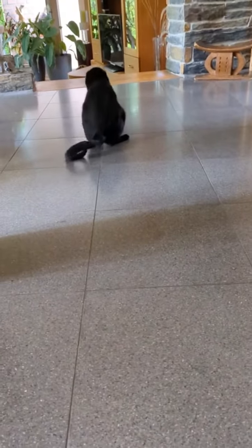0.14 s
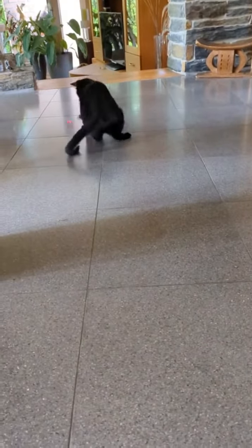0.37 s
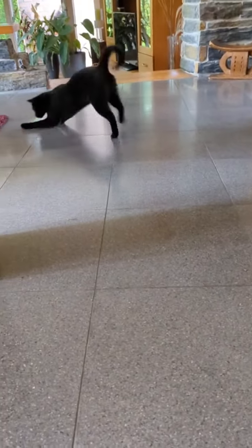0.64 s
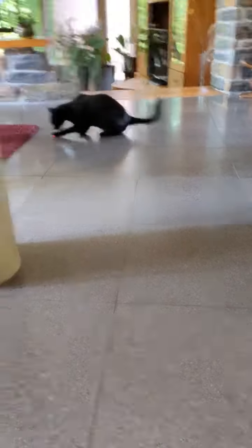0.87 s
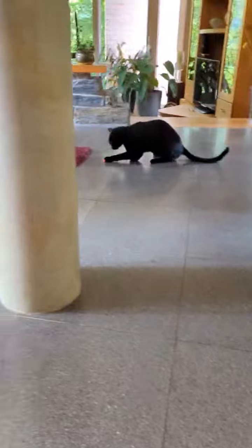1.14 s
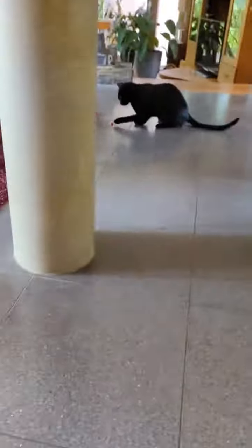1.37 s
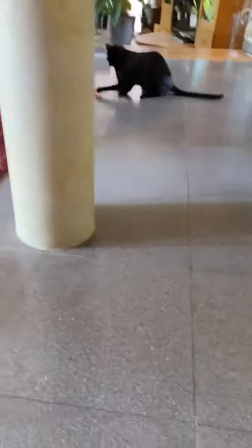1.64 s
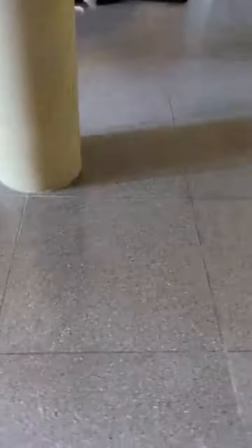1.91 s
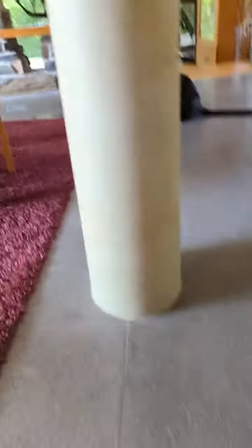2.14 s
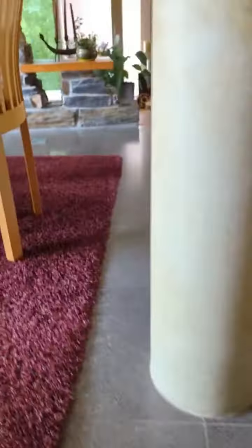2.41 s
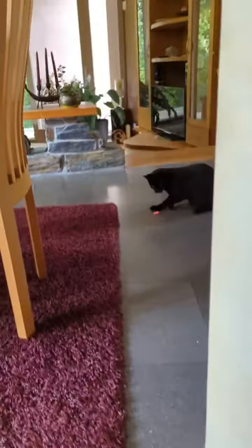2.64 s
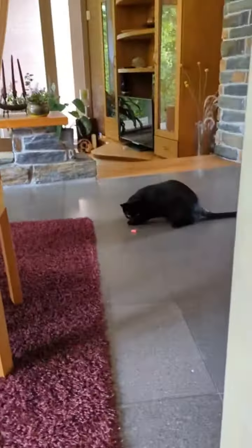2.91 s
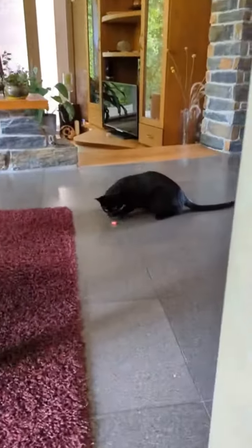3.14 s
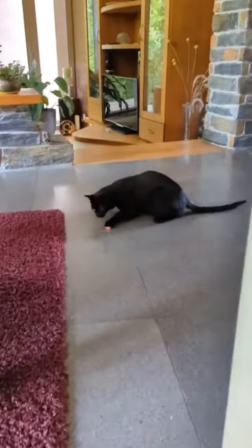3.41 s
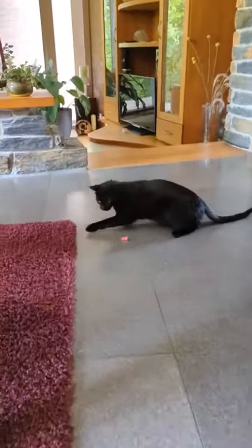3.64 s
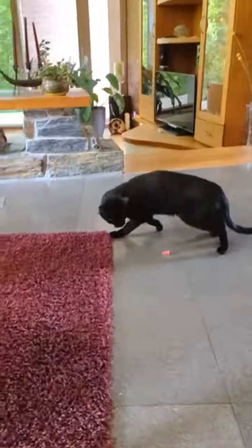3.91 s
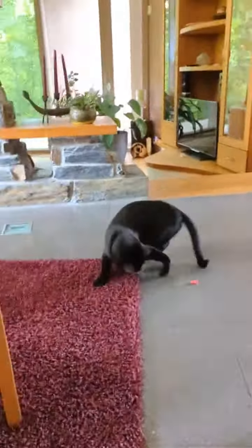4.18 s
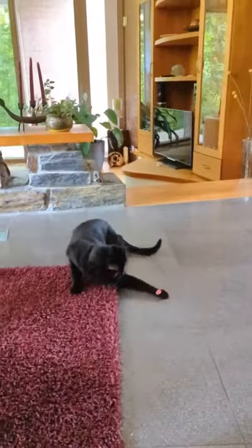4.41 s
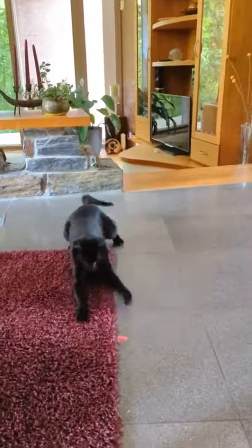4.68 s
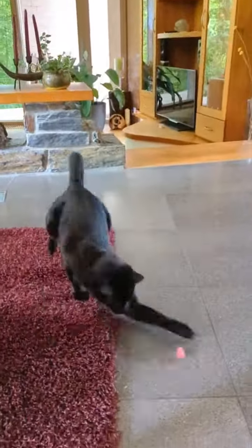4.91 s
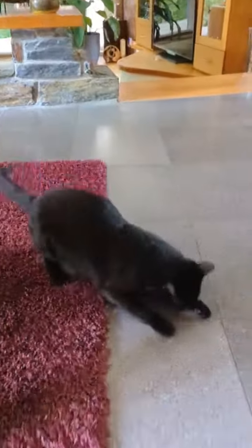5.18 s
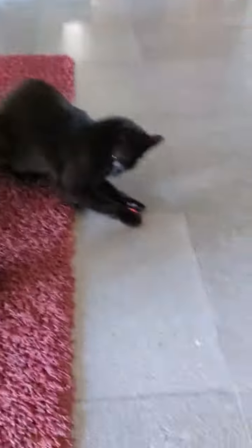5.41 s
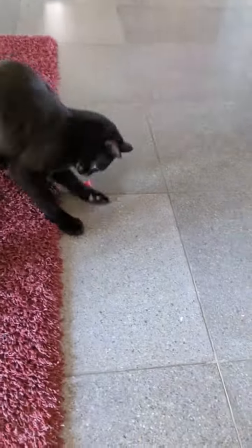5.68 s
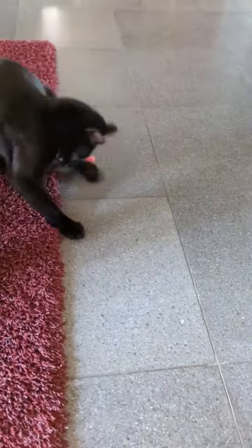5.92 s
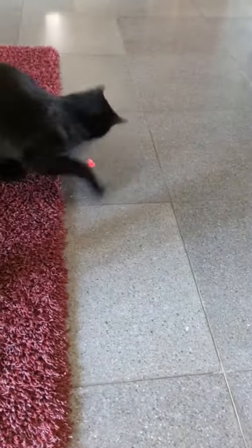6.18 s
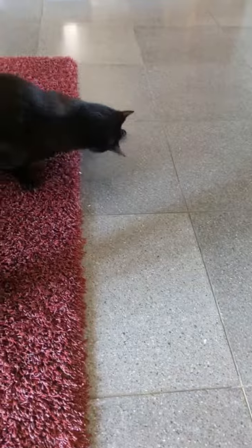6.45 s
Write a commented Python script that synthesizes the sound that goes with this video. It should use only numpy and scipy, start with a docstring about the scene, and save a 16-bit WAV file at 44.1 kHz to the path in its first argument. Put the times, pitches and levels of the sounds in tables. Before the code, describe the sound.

In a large, echoing living room a cat chases a small foam plug over stone. A sharp knock with a low boom comes early, then sparse scuffs. Close finger ticks and rubs sound on the hand-held phone, mostly at right. Skids quicken around four seconds, peak near five with claw clacks and a thin tag jingle, then fade to faint scuffs.

```python
"""Faint air fills a large, echoing living room as the first soft steps boom in its lowest modes.
A cat chases a foam plug over the stone floor: paws knock and skid as bursts of grit, claws snap as clicks.
From 1.6 to 4 s a finger ticks and rubs beside the right port of the hand-held phone, and the grip bumps.
Around 5 s the collar tags jingle as struck modes amid the hardest skids, then the paws grow quieter."""
import sys
import numpy as np
from scipy import signal
from scipy.fft import rfft, irfft
from scipy.io import wavfile
from scipy.ndimage import uniform_filter1d

SR = 44100
rng = np.random.default_rng(int(sys.argv[2]) if len(sys.argv) > 2 else 0)


def natural_amplitude(level_db):
    """Convert a level in decibels to a linear amplitude factor, elementwise."""
    exponent = np.asarray(level_db, float) / 20
    return 10 ** exponent


def unload_wav(signal):
    """Save mono or channel-first audio to the path in sys.argv[1] as 16-bit WAV at rate SR, clipped to [-1, 1]."""
    wavfile.write(
        sys.argv[1],
        SR,
        np.round(np.clip(np.atleast_2d(signal).T, -1, 1) * 32767).astype(np.int16),
    )


N = 289296
TIME = np.arange(N) / SR


def rms_one(x):
    """Scale to unit rms."""
    return x / np.sqrt(np.mean(x ** 2) + 1e-20)


def at_hz(points, hz):
    """Read a curve over frequency on a log axis."""
    curve_hz, value = np.transpose(points)
    return np.interp(np.log(hz), np.log(curve_hz), value)


def band(x, low_hz, high_hz):
    """Band-pass."""
    sos = signal.butter(2, [low_hz, min(high_hz, .45 * SR)], "band", fs=SR, output="sos")
    return signal.sosfilt(sos, x)


def ring(clicks, hz, t60):
    """A damped resonance: a unit click starts a sine of height 1 that falls 60 dB in t60 seconds."""
    decay, turn = natural_amplitude(-60 / (t60 * SR)), 2 * np.pi * hz / SR
    return signal.lfilter([0, np.sin(turn)], [1, -2 * decay * np.cos(turn), decay * decay], clicks + 1e-18)


def click_at(s):
    """A unit click at s seconds."""
    return 1. * (np.arange(N) == round(s * SR))


def grit(size, spread_db):
    """Dense grains of uneven size, as from a rough surface sliding."""
    grain_db = spread_db * np.minimum(rng.exponential(1, size), 5)
    return rms_one(natural_amplitude(grain_db) * rng.choice([-1, 1], size))


def even_burst(size, landing):
    """Grit under a pressure that rises and lifts, spread evenly over all pitches; energy 1."""
    progress = np.arange(1, size + 1) / (size + 1)
    lumps_db = np.interp(progress, np.linspace(0, 1, 12), rng.normal(0, 4, 12))  # the paw slips unevenly
    shape = progress ** landing * (1 - progress) ** 0.896 * natural_amplitude(lumps_db)
    burst = grit(size, spread_db=3.0) * shape
    # flatten the spectrum and restore the envelope in turn
    for _ in range(4):
        spectrum = rfft(burst, 2 * size)
        burst = irfft(spectrum / (abs(spectrum) + 1e-12))[:size]
        local_power = uniform_filter1d(burst ** 2, size=max(size // 6, 8))
        burst *= shape / np.sqrt(local_power + 1e-12)
    return burst / np.sqrt(np.sum(burst ** 2))


# thud, pad, scuff, claw and hiss registers: (low f/Hz, high f/Hz)
PAW_REGISTERS = [(270, 578), (560, 962), (960, 2050), (2150, 3460), (3500, 13800)]
# short knocks of a paw: (t/s, relative level/dB, tilt/dB per register, extra scuff level/dB, hiss level/dB)
PAW_KNOCKS = [(.786, -20.5, 0.5, -10, -28.5), (1.188, -53.5, 5.5, -6, -52), (1.233, -37.5, -4.5, 0, -41),
              (1.6, -81, -9, -1, -56), (2.263, -58.5, 4.5, 1, -55), (3.206, -60, -1, 0, -64),
              (3.413, -58.5, 5.5, 7, -64), (4.587, -44.5, 3, 5, -51), (4.952, -36.5, 4.5, 2.5, -28),
              (5.073, -40.5, 0, 3, -35)]
# skids of pads and fur: (t/s, length/s, relative level/dB, tilt/dB per register, hiss level/dB)
PAW_SKIDS = [(0.3, 0.079, -68, 1, -60.5), (1.369, .06, -61, 1, -58.5), (2.667, 0.062, -65.5, -4, -56),
             (2.77, .17, -52.5, -3.5, -55), (3.47, .1, -40.5, -.5, -32.5), (3.881, 0.038, -50.5, -0.5, -33),
             (3.955, 0.052, -39, 0, -23), (4.019, 0.051, -37.5, -1.5, -25.5), (4.187, 0.11, -35, -1, -27.5),
             (4.307, 0.037, -36, 1, -23), (4.602, 0.057, -46.5, 2.5, -48.5), (5, .046, -23, -1, -21),
             (5.465, 0.087, -49, -0.5, -44.5), (5.575, .084, -51, -1.5, -51.5),
             (5.791, 0.031, -51.5, -1, -48.5), (6.05, 0.24, -72, 4, -52), (6.358, 0.086, -68, -9, -57.5)]
KNOCK_S, SKID_SCUFF_DB = .014, 3
KNOCK_LANDING, SKID_LANDING = 0.38, 0.907   # steepness of the pressure's rise (small = sudden)


def paws():
    """Each contact is a burst of grit shared over five registers; its tilt favours the thud or the claw."""
    drive = np.zeros((len(PAW_REGISTERS), N))
    contacts = [(s, KNOCK_S, KNOCK_LANDING, *rest) for s, *rest in PAW_KNOCKS]
    contacts += [(s, length, SKID_LANDING, db, tilt, SKID_SCUFF_DB, hiss_db)
                 for s, length, db, tilt, hiss_db in PAW_SKIDS]
    for s, length, landing, db, tilt, scuff_db, hiss_db in contacts:
        body_db = db + tilt * (np.arange(4) - 3 / 2) + [0, 0, scuff_db, 0]
        register_db = np.append(body_db, hiss_db)
        at, size = round(s * SR), round(length * SR)
        drive[:, at:at + size] += natural_amplitude(register_db)[:, None] * even_burst(size, landing)
    out = np.zeros(N)
    for burst, (low, high) in zip(drive, PAW_REGISTERS):
        # filtered twice, so that neighbouring registers join evenly at their edges
        filtered = band(band(burst + 1e-18, low, high), low, high)
        out += filtered * np.sqrt(SR / 2 / (high - low))   # makes up for the narrowness of the band
    return out


# a claw or pad snaps off the stone with a pitch of its own: (t/s, relative level/dB, f/Hz)
CLAW_CLACKS = [(1.195, -41.5, 3800), (1.6, -59, 6300), (2.69, -60, 258), (2.9, -49.5, 255),
               (2.905, -48.5, 566), (4.6, -38.5, 1510), (4.955, -25, 773), (5.015, -23.5, 1180),
               (5.81, -53, 1120), (6.36, -51, 248), (6.425, -52, 223)]
CLACK_CYCLES = 28   # periods to fall 60 dB


def clacks():
    """One click into a short resonance; the level column sets its energy."""
    out = np.zeros(N)
    for s, db, hz in CLAW_CLACKS:
        snap = ring(click_at(s), hz, CLACK_CYCLES / hz)
        out += natural_amplitude(db) * snap / np.sqrt(np.sum(snap ** 2))
    return out


# collar tags touching: (t/s, first tag relative level/dB, second tag relative level/dB, brightness/dB per octave)
TAG_TOUCHES = [(4.59, -67, -84, -20), (5.078, -49.5, -52, 0), (5.105, -54.5, -49, -7),
               (5.139, -50.5, -56, 0), (5.185, -59, -71, 6), (5.231, -64.5, -71, -17),
               (5.29, -71, -88, -13)]
# modes of the metal: (f/Hz)
TAG_MODES_HZ = [3731, 5825, 6880, 7515, 8484, 9851, 10680, 12270, 13200, 14460, 14890, 15160, 15520]
# strength of each mode: (relative level/dB)
TAG_MODES_DB = [-19.5, -14, -16.5, -8, 0, -8.5, -7, -9, -21, -4.5, -20, -22, -8]
# the tag each mode belongs to: (0 = first, 1 = second)
TAG_OF_MODE = [1, 0, 1, 1, 1, 1, 0, 0, 1, 1, 0, 1, 0]
TAG_T60_S = .12


def tags():
    """Two small metal tags: every touch strikes each mode with its own strength; the room adds a longer tail."""
    s, *tag_db, bright = np.transpose(TAG_TOUCHES)
    out = np.zeros(N)
    luck_db = rng.normal(0, 3, (len(s), len(TAG_MODES_HZ)))
    for k, (hz, mode_db) in enumerate(zip(TAG_MODES_HZ, TAG_MODES_DB)):
        strike_db = tag_db[TAG_OF_MODE[k]] + mode_db + bright * np.log2(hz / 10000) + luck_db[:, k]
        clicks = np.zeros(N)
        clicks[(s * SR).astype(int)] = natural_amplitude(strike_db)
        out += ring(clicks, hz, TAG_T60_S)
    return out


# left-right likeness of diffuse sound: (f/Hz, likeness from -1 to 1)
STEREO_LIKENESS = [(60, 0.14), (250, 0.96), (500, 0.44), (1000, -0.085), (3000, 0.008), (12000, 0.015)]
EDGES_HZ = 30 * 2 ** np.arange(0, 9.6, .5)   # half-octave band edges


def stereo_bands(size):
    """Half-octave bands of stereo noise, most alike in the upper bass, nearly unrelated in the treble."""
    white = rng.standard_normal((2, 2, size))
    for k, (low, high) in enumerate(zip(EDGES_HZ, EDGES_HZ[1:])):
        hz = np.sqrt(low * high)
        alike = np.clip(at_hz(STEREO_LIKENESS, hz), -1, 1)
        mid, side = band(white[k % 2], low, high)
        stereo = np.sqrt(1 + alike) * mid + np.sqrt(1 - alike) * side * [[1], [-1]]
        yield hz, stereo / np.sqrt(2)


# reverberation time of the room: (f/Hz, T60/s)
ROOM_DECAY = [(60, 0.81), (160, 0.83), (420, 0.66), (1100, 0.76), (2900, 0.71), (7700, 0.5), (15000, 0.4)]
DIRECT_DB, BUILD_UP_S = 19.5, .009


def room(x):
    """A direct sound weaker than the sum of the dense echoes, which build up, then die fastest in the treble."""
    t = np.arange(SR) / SR
    echoes = sum(noise * natural_amplitude(-60 * t / at_hz(ROOM_DECAY, hz)) for hz, noise in stereo_bands(SR))
    echoes = echoes * (1 - np.exp(-t / BUILD_UP_S))
    echoes[:, 0] = natural_amplitude(DIRECT_DB)
    return signal.fftconvolve(x[None], echoes, axes=1)[:, :N]


# soft steps: (t/s, level/dB, pitch centre f/Hz)
SOFT_STEPS = [(.397, -55, 92), (.643, -58, 85), (.795, -28.5, 88), (1.076, -51, 69.6), (1.242, -33, 109),
              (1.511, -44.5, 81), (2.269, -47, 138), (3.118, -57, 190), (3.501, -38.5, 160),
              (4.038, -55, 140), (4.224, -49, 161), (4.336, -45, 176), (4.613, -54, 138),
              (4.97, -47.5, 131), (5.496, -59, 125), (5.617, -58.5, 126), (5.739, -59.5, 106.7),
              (6.373, -55.5, 147)]
# lowest modes of the room: (f/Hz)
BOOM_MODES_HZ = [55, 68, 78.8, 89, 107, 123, 137.2, 164, 183, 210.4, 230.4, 246]
STEP_T60_S, STEP_WIDTH_OCT = 0.56, 0.75


def steps():
    """A soft push starts the low modes near its own pitch, each at a phase of its own."""
    out = np.zeros(N)
    phases = rng.random((len(SOFT_STEPS), len(BOOM_MODES_HZ), 1))   # in turns
    t = np.arange(SR) / SR
    rise = 1 - np.exp(-t / .006)
    for (s, db, centre_hz), phase in zip(SOFT_STEPS, phases):
        octaves_away = np.log2(np.array(BOOM_MODES_HZ) / centre_hz)
        near = np.exp(-(octaves_away / STEP_WIDTH_OCT) ** 2)
        modes = near @ np.sin(2 * np.pi * (np.outer(BOOM_MODES_HZ, t) + phase))
        boom = natural_amplitude(db) * modes / np.sqrt(np.sum(near ** 2)) * rise * natural_amplitude(-60 * t / STEP_T60_S)
        at = round(s * SR)
        out[at:at + SR] += boom[:N - at]
    return out


# finger ticks on the case: (t/s, relative level/dB, ring f/Hz, low push relative level/dB)
FINGER_TICKS = [(1.911, -17, 437, -58), (1.989, -23.5, 207, -38), (2.139, -42, 1990, -58),
                (2.164, -22.5, 740, -54), (2.901, -33.5, 486, -73), (2.963, -24.5, 605, -34),
                (2.982, -28.5, 340, -40.5), (3.007, -28, 507, -44), (3.033, -25, 415, -38.5),
                (3.416, -38, 1450, -54), (3.915, -22.5, 333, -50)]
# finger sliding by the right port: (start t/s, end t/s, relative level at start/dB, at end/dB)
FINGER_RUBS = [(1.596, 1.848, -61, -57), (1.856, 1.885, -47, -49), (1.91, 2.015, -39.5, -35.5),
               (2.129, 2.167, -55.5, -51), (2.172, 2.225, -39, -45.5), (3.035, 3.143, -47, -52.5),
               (3.929, 3.971, -45.5, -29.5)]
# spectrum of the rub: (f/Hz, relative level/dB per Hz)
RUB_SPECTRUM = [(180, -38), (300, -1), (1000, -2.5), (2800, -0.5), (5400, 0), (8100, -4), (11000, 2.5),
                (14300, -44), (22000, -120)]
TICK_LEFT_DB, RUB_LEFT_DB = -37, -30   # left port against right
RUB_LAND_DB_PER_S, RUB_LIFT_DB_PER_S, RUB_TOP_HZ = 4000, 904, 11140


def finger():
    """Dry and close: skin sticks and lets go with a tick, a short fizz and a push, and slides with a rough hiss."""
    out, t = np.zeros((2, N)), np.arange(SR // 20) / SR
    top_cut = signal.cheby2(6, 30, RUB_TOP_HZ, fs=SR, output="sos")
    fizz = band(rng.standard_normal((len(FINGER_TICKS), len(t))), 1800, 10500)
    fizz = signal.sosfilt(top_cut, fizz)
    for (s, db, hz, push_db), noise in zip(FINGER_TICKS, fizz):
        # starts as a bright snap, falls to the case's ring
        cycles = hz * (t + 0.00182 * (1 - np.exp(-t / 0.00018)))
        tick = np.sin(2 * np.pi * cycles) * t / 0.00052 * np.exp(1 - t / 0.00053)
        tick += 0.39 * noise * np.exp(-(t / 0.0046) ** 3)
        push = np.sin(2 * np.pi * 110 * t) * np.exp(-t / 0.0089)
        at = round(s * SR)
        out[:, at:at + len(t)] += natural_amplitude([[TICK_LEFT_DB], [0]]) * 2 * (natural_amplitude(db) * tick + natural_amplitude(push_db) * push)

    skin = grit((2, N), spread_db=2.5)
    hiss = np.zeros(N)
    for k, (low, high) in enumerate(zip(EDGES_HZ[5:], EDGES_HZ[6:])):
        hiss += natural_amplitude(at_hz(RUB_SPECTRUM, np.sqrt(low * high))) * band(skin[k % 2], low, high)
    hiss = signal.sosfilt(top_cut, rms_one(hiss))
    for start, end, start_db, end_db in FINGER_RUBS:
        db = np.interp(TIME, [start, end], [start_db, end_db])
        db -= RUB_LAND_DB_PER_S * np.maximum(start - TIME, 0)
        db -= RUB_LIFT_DB_PER_S * np.maximum(TIME - end, 0)
        out += natural_amplitude([[RUB_LEFT_DB], [0]]) * 2 * natural_amplitude(np.maximum(db, -300)) * hiss
    return out


# shifts of grip, felt through the case: (t/s, relative level/dB, f/Hz)
GRIP_SHIFTS = [(1.693, -45, 78), (1.769, -50, 172), (1.856, -36.5, 83), (1.98, -32, 135.5),
               (2.958, -43, 105), (3.126, -49, 190)]
GRIP_T60_S, GRIP_LEFT_DB = 0.1, -29


def grip():
    """The hand tightens: a short dull bump, mostly in the right port."""
    bumps = np.zeros(N)
    for s, db, hz in GRIP_SHIFTS:
        bumps += ring(natural_amplitude(db) * click_at(s), hz, GRIP_T60_S)
    dull = signal.sosfilt(signal.butter(2, 300, fs=SR, output="sos"), bumps)
    return natural_amplitude([[GRIP_LEFT_DB], [0]]) * 2 * dull


# the air of the house: (t/s, rumble level under 1 kHz/dB, hiss level above/dB)
AIR_LEVELS = [(0, -61.5, -59.5), (.5, -69, -64), (.75, -74.5, -63.5), (1.45, -49, -52.5),
              (1.59, -60, -58.5), (1.62, -60.5, -56.5), (2.099, -59.5, -55.5), (2.5, -61.5, -53),
              (3.3, -57.5, -57), (4.9, -64, -59), (5.9, -69.5, -57), (6.301, -70.5, -69.5),
              (6.56, -59.5, -66.5)]
# spectrum of the air: (f/Hz, relative level/dB per Hz)
AIR_SPECTRUM = [(18, -52), (30, -19), (95, -5), (319, 2), (740, -6.5), (1540, -16), (1760, -3.5),
                (2170, -9), (3490, -17.5), (7090, -15.5), (8080, -18.5), (11700, -19), (16000, -35.5)]


def air():
    """Far rumble and hiss: coloured stereo noise, each part rising and falling on its own."""
    s, rumble_db, hiss_db = np.transpose(AIR_LEVELS)
    rumble, hiss = np.zeros((2, N)), np.zeros((2, N))
    for hz, noise in stereo_bands(N):
        part = rumble if hz < 1000 else hiss
        part += natural_amplitude(at_hz(AIR_SPECTRUM, hz)) * noise
    rumble = natural_amplitude(np.interp(TIME, s, rumble_db)) * rms_one(rumble)
    hiss = natural_amplitude(np.interp(TIME, s, hiss_db)) * rms_one(hiss)
    return rumble + hiss


def scene():
    """The cat is heard through the room, a touch to the right; steps, hand and air reach the ports directly."""
    cat = room(paws() + clacks() + tags()) * natural_amplitude([[-.3], [.3]])
    return cat + steps() + finger() + grip() + air()


def band_limit(x):
    """A steep low-pass at the top of the band."""
    return signal.sosfilt(signal.butter(12, 16990, fs=SR, output="sos"), x)


# dips and peaks of the microphone ports: (f/Hz, width/Hz, level/dB)
PORT_RESONANCES = [(8030, 780, -5.5), (13200, 370, -14.5), (5430, 550, -4.5), (10400, 440, 3),
                   (11900, 1170, 5.5), (14840, 1400, 8)]
BASS_CUT_HZ, TOP_HZ = 55, 16100


def record(dry):
    """The ports add dips and peaks in the treble and cut the deep bass and the top."""
    for hz, width_hz, level_db in PORT_RESONANCES:
        b, a = signal.iirpeak(hz, hz / width_hz, fs=SR)
        dry = dry - (1 - natural_amplitude(level_db)) * signal.lfilter(b, a, dry)
    dry = signal.sosfilt(signal.butter(3, BASS_CUT_HZ, "high", fs=SR, output="sos"), dry)
    dry = signal.sosfilt(signal.ellip(10, .5, 60, TOP_HZ, fs=SR, output="sos"), dry)
    return band_limit(dry)


dry = scene()
out = record(dry)
unload_wav(out)
```